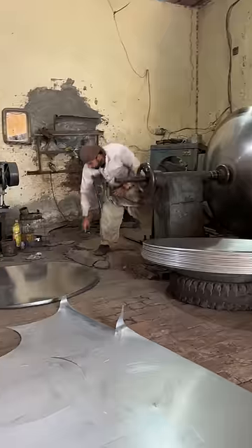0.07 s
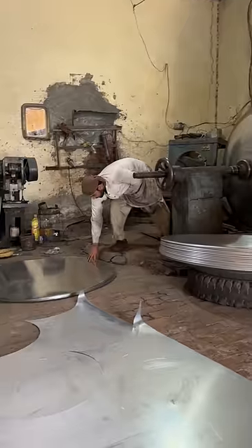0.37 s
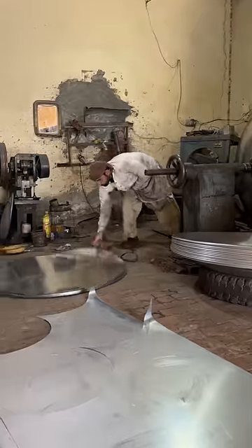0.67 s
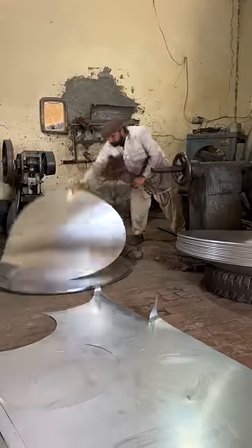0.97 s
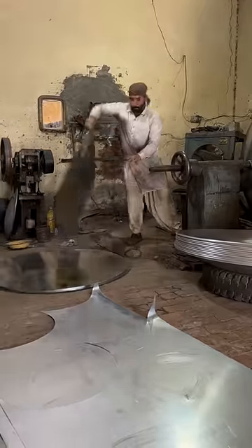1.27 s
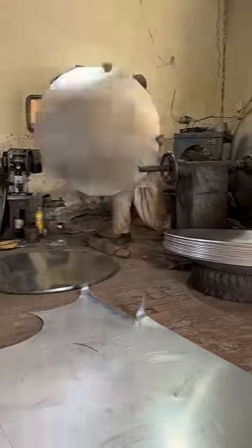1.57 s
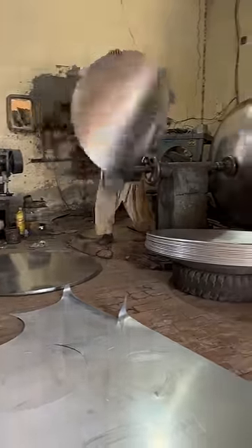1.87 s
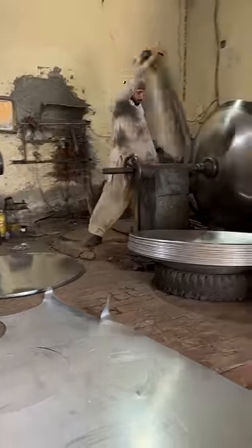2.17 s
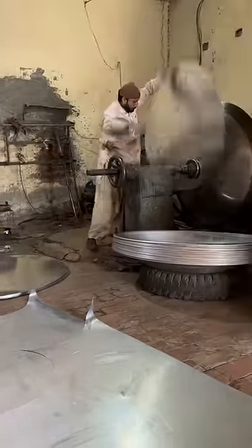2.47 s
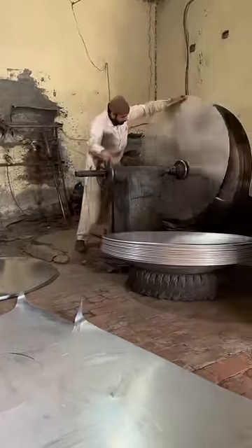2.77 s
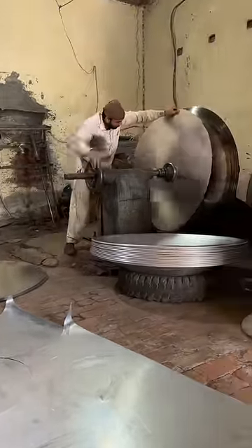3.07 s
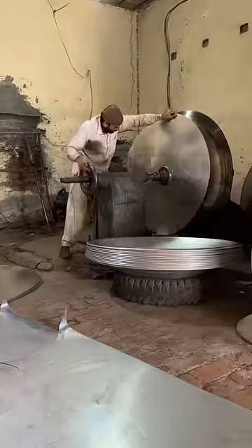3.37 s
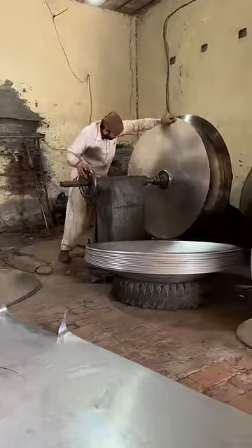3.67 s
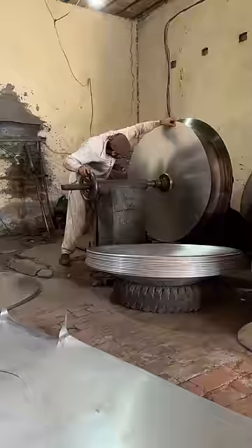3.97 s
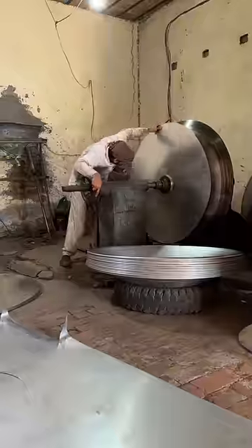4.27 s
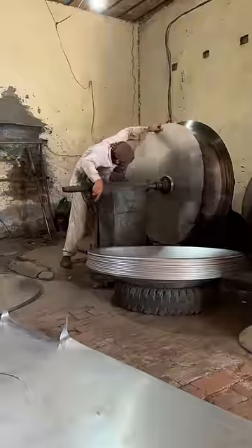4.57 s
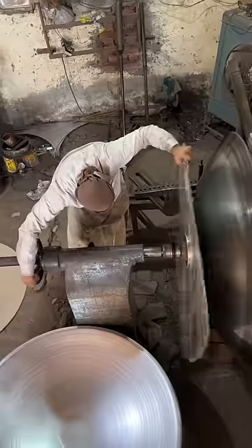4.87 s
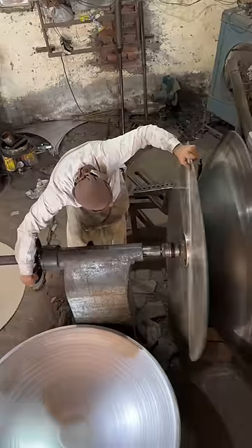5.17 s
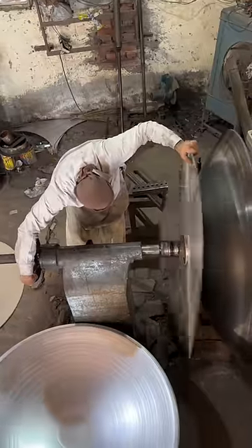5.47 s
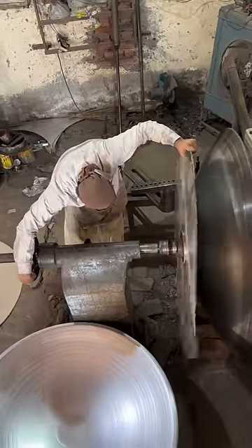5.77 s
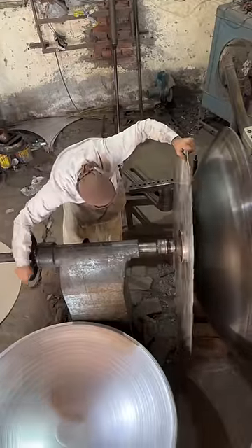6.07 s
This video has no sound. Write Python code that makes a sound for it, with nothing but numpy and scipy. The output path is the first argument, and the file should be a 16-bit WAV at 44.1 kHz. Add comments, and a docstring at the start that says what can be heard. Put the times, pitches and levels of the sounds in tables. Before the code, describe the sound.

After a few foot scuffs, a big metal sheet scrapes and squeals off a pile, then clangs and booms with a wavering pitch. Softer flexing and shuffling lead to a second loud burst as it meets a lathe chuck and starts spinning, clattering quickly and dying away. A motor hums faintly underneath, and the microphone picks up a short echo from the workshop's hard walls.

```python
"""A big thin metal disc is dragged off a stack in a workshop, carried, and pushed against a lathe chuck.
Each buckle excites its bending modes: it booms, and changing curvature makes the pitch wobble.
Sliding friction makes its edge hiss, grind and squeal. Then it spins up and its rim strikes the chuck
about ten times a second, dying away as the clamp tightens. Feet scuff, a motor hums, and
reflections from the bare walls add a short reverberation."""
import sys
import numpy as np
from scipy import signal
from scipy.fft import rfft, irfft, next_fast_len
from scipy.io import wavfile
from scipy.ndimage import uniform_filter1d, map_coordinates

SR = 44100
rng = np.random.default_rng(int(sys.argv[2]) if len(sys.argv) > 2 else 0)


def materialize(psi):
    """Save the field psi as 16-bit PCM at rate SR to the path in sys.argv[1].

    A 1-D psi becomes a single channel; in a 2-D psi each row is a channel.
    """
    bounded = np.clip(np.atleast_2d(psi).T, -1, 1)
    quanta = np.round(bounded * 32767).astype(np.int16)
    wavfile.write(sys.argv[1], SR, quanta)


N = 274302
T = np.arange(N) / SR
TICKS = T[::40]  # coarse time grid for envelopes
BANDS_HZ = 31.25 * 2 ** np.arange(0, 9.5, .5)
TOP_HZ = 15850
LEAN_S, CLAMP_S, SPIN_S = 2.55, 4.6, 4.94  # the disc meets the chuck, is clamped, starts to turn

# Levels in the tables are relative; each source applies its own gain.
# the disc's fixed ringing pitches: pitch_hz, level_db
DISC_MODES = [(114, -3.5), (288, -3), (428, -4), (463, -2.5), (544, -8.5), (673, -3.5), (1266, -6.5),
              (1420, -4), (1611, -12)]
# low modes that drone as it spins: pitch_hz, level_db
LOW_MODES = [(179, -2.5), (290, -4.5), (441, -0.5), (673, 1)]
# high modes of the rim: pitch_hz, level_db
HIGH_MODES = [(2035, -0.5), (2375, 1), (2982, -4), (3680, -17), (4380, -18.5), (5080, -20.5), (5840, -21.5)]
# the disc buckles: start_s, level_db, t60_s, lowest_strong_mode_hz
DISC_BUCKLES = [(0.664, -40.5, 1.27, 466), (.772, -31.5, 1.7, 308), (.88, -31.5, 0.26, 230),
                (1.013, -27, 0.2, 303), (1.327, -16.5, 1.65, 357), (1.373, -14.5, 1.4, 350),
                (1.592, -10.5, 0.44, 256), (1.661, -18, 1.2, 500), (1.93, -27, 0.29, 478),
                (2.256, -22.5, 0.45, 444), (2.282, -18.5, 0.3, 454), (2.361, -23.5, 1.4, 130),
                (2.383, -17, 1.3, 296), (2.659, -22, 0.51, 250), (2.801, -29.5, 1.6, 208),
                (3.026, -28, 0.12, 215.4), (3.109, -38, 1.07, 188), (3.265, -37, 0.67, 220),
                (3.404, -36.5, 0.39, 190), (3.63, -43.5, 2.6, 135), (4.026, -38, 1.15, 227),
                (4.268, -29.5, 1.6, 180), (4.355, -29, 2.4, 190), (4.543, -25, 1, 211),
                (4.647, -14, 0.13, 260), (4.68, -14.5, 1, 346), (4.734, -15, 0.6, 610),
                (4.794, -16, 0.3, 292), (4.886, -9, 0.21, 264)]
# one mode dominates a hard buckle: start_s, pitch_hz, level_db, t60_s, glide_octaves_per_s
MODE_GLIDES = [(.79, 592, -37, 0.12, 0), (.89, 451, -37, .22, -2.5), (1.33, 465, -19.5, 0.14, -0.7),
               (1.34, 1271, -26, 0.48, 0.5), (1.602, 345, -14, .13, 0.6), (1.604, 500, -19, 0.13, 0),
               (1.63, 548, -13.5, 0.08, 1), (1.65, 446, -17.5, 0.18, -1.7), (1.66, 666, -21.5, 0.22, 2.2),
               (2.262, 329.7, -25.5, 0.21, -0.8), (2.28, 690, -25, 0.4, 0.9), (2.28, 1105, -26.5, 0.18, 0),
               (2.29, 828, -24.5, .13, 0), (2.67, 468, -23, 0.2, -1), (3.028, 343, -42, 0.21, 0),
               (4.646, 347, -19, 0.17, 2), (4.738, 730, -18.5, 0.17, 1), (4.799, 268.6, -18.5, 0.11, 2),
               (4.885, 319.8, -18.5, .16, 1.5)]
# the rim knocks against metal: start_s, level_db, t60_s
RIM_KNOCKS = [(.775, -40.5, .16), (2.103, -41, .1), (3.03, -48, 0.083), (3.271, -63, 0.05),
              (4.032, -46, 0.075), (4.29, -49.5, .06), (4.738, -26.5, 0.51), (4.816, -15.5, 0.091),
              (4.913, -14.5, 0.041), (5.031, -19, 0.19), (5.168, -26, 0.16), (5.371, -16, 0.088)]
# the spinning rim slaps the chuck: start_s, level_db, zone_centre_hz
RIM_SLAPS = [(4.922, -17.5, 1440), (5.051, -19, 1500), (5.14, -18.5, 1700), (5.256, -19.5, 1150),
             (5.385, -21.5, 1980), (5.468, -20.5, 1080), (5.565, -23, 860), (5.668, -26, 890),
             (5.766, -26.5, 1200), (5.873, -28.5, 1300), (5.97, -36.5, 900), (6.05, -39, 1090)]
# the sliding edge squeals: start_s, pitch_hz, level_db, rise_s, t60_s
EDGE_SQUEALS = [(1.064, 3396, -34, 0.048, 0.38), (.775, 2470, -42, 0.011, 0.091)]
# the rim catches and clangs: start_s, level_db, rise_s, t60_s, tilt_db_per_octave
RIM_CLANGS = [(1.385, -42, 0.023, 0.54, -18), (1.599, -24, 0.023, .25, -4.5),
              (1.642, -23.5, .028, 0.2, 2.5), (2.39, -44, 0.071, 1.0, 0)]
# the disc slides over the stack: time_s, hiss_db, grind_db
DRAG_LEVELS = [(0.64, -60.5, -59), (0.692, -58, -46.5), (0.908, -40.5, -38), (0.994, -43, -32),
               (1.076, -24.5, -32), (1.154, -32, -25.5), (1.313, -54.5, -46.5), (1.361, -57.5, -44.5)]
# shoes and cloth brush past: start_s, level_db, rise_s, t60_s
FOOT_SCUFFS = [(.044, -46, 0.0086, 0.43), (.24, -52.5, 0.052, 2.4), (.34, -42.5, 0.068, 0.86),
               (2.142, -47.5, 0.022, 1.2), (2.249, -46, 0.0057, 2.4), (2.665, -42.5, 0.032, 0.45),
               (2.832, -49, 0.03, 0.39), (3.03, -54, .007, 0.35), (3.272, -60.5, .006, 3.8),
               (3.38, -51.5, 0.031, 0.22), (4.06, -67.5, 0.034, 1.6), (3.684, -40, 0.002, 0.51),
               (4.197, -59.5, .006, 0.79), (4.291, -51.5, 0.026, 2.4), (4.658, -45.5, 0.044, 0.65)]
# the level dips briefly: centre_s, depth_db, half_width_s
LEVEL_DIPS = [(4.875, -6.5, 0.0093)]
# spectral envelopes of the sources: frequency_hz, density_db
BOOM_SPECTRUM = [(25, -6), (60, -7), (125, 3.5), (330, 1.5), (650, 0.5), (1200, 0), (2400, -4.5),
                 (5000, -8), (9000, -12.5)]
RATTLE_SPECTRUM = [(30, -32), (100, -18), (170, -10), (320, 2), (480, -0.5), (800, 3.5), (1500, 1),
                   (2300, -1), (3200, -11), (4800, -16.5), (16000, -27.5)]
HISS_SPECTRUM = [(1500, -7), (3300, 1), (5000, 0.5), (7500, 0.5), (10000, -3), (12000, -20), (16000, 0.5)]
GRIND_SPECTRUM = [(200, -38), (500, -7.5), (850, 0), (1400, -6), (2600, -4.5), (4000, -23), (8000, -36.5)]
SCUFF_SPECTRUM = [(100, -13), (600, -0.5), (1300, -3), (2600, 3), (4500, -1), (7500, -2.5), (10000, -8.5),
                  (16000, -14.5)]
RUMBLE_SPECTRUM = [(20, -11.5), (50, -0.5), (80, 0.5), (200, -4.5), (1500, -22.5), (6000, -37.5),
                   (16000, -57.5)]
# stereo width: frequency_hz, side_over_mid_db
STEREO_WIDTH = [(60, -32.5), (120, -17), (250, -10), (600, -2.5), (2400, -2.5), (5000, 0), (9800, -1),
                (12000, 22.5), (14500, -0.5)]


def buckling_disc():
    """Snap-through buckling releases elastic energy as a boom, a deep sway and a lingering shimmer."""
    start, db, t60, low_hz = np.transpose(DISC_BUCKLES)[:, :, None]
    force_db = db + 13.5  # relative to a full-strength buckle
    hangs_free = start < LEAN_S
    # a small, tight buckle is higher throughout; leaning on the chuck dulls it
    bright_hz = np.where(hangs_free, 835, 550) * (low_hz / 300) ** 0.44
    rise_s = 0.0083 + 0.013 * t60  # broad, long-ringing bends build up more slowly than snaps
    vibration = flexing_plate() + amp(-9) * clicks(per_s=900, spread_db=3.5)
    booms = ring(vibration, start, db, boom_share(low_hz, bright_hz), rise_s, t60, cascade=0.43)
    sway_db = -43.5 + 0.74 * force_db
    sway_t60 = np.where(start < CLAMP_S, 0.99, 0.24)
    sway = ring(vibration, start, sway_db, boom_share(113, 304), rise_s=0.027, t60=sway_t60)
    # hard buckles spill far more energy into the high modes
    shimmer_db = -37.5 + 2.36 * force_db + np.where(hangs_free, 0, -11)
    shimmer = ring(vibration, start, shimmer_db, boom_share(1880, 2570), rise_s=0.11, t60=1.53 * t60)
    flapping = amp(-3 + 1.5 * walk(24.05))
    return flapping * (booms + sway + shimmer)


def boom_share(low_hz, bright_hz):
    """Band-limited excitation: a buckle hardly moves the modes under low_hz or over bright_hz."""
    low_cut = amp(-19) + 1 / np.sqrt(1 + (low_hz / BANDS_HZ) ** 6)
    return band_share(BOOM_SPECTRUM, bright_hz, steep=6.04) * low_cut


def flexing_plate(crossover_hz=480):
    """Curvature detunes the floppy low modes much further than the stiff high ones."""
    floppy = bending_plate(spacing_hz=27, detune=.075, bends_per_s=13, swap_hz=3.1)
    stiff = bending_plate(spacing_hz=43, detune=.025, bends_per_s=12, swap_hz=1.8)
    lows = filtered(floppy, lambda hz: 1 / np.hypot(1, (hz / crossover_hz) ** 2))
    highs = filtered(stiff, lambda hz: 1 / np.hypot(1, (crossover_hz / (hz + 1)) ** 2))
    return lows + highs


def bending_plate(spacing_hz, detune, bends_per_s, swap_hz):
    """Mode coupling: bending passes energy between two sets of modes and pulls their pitch about."""
    angle = 2 * np.pi * swap_hz * T
    modes = np.cos(angle) * plate(spacing_hz) + np.sin(angle) * plate(spacing_hz)
    return delayed(modes, detune * np.cumsum(walk(bends_per_s)) / SR)


def plate(spacing_hz, count=900):
    """Constant modal density: randomly placed modes, one per spacing_hz, join the fixed ones."""
    size = next_fast_len(N)
    offset, weakness, phase_turns = rng.random((count, 3)).T
    scattered = np.column_stack([(np.arange(count) + 1 + offset) * spacing_hz, -11 * weakness])
    hz, db = np.vstack([DISC_MODES, scattered])[:count].T
    phasors = amp(db) * np.exp(2j * np.pi * phase_turns)
    lines = np.zeros(size // 2 + 1, complex)
    lines[(hz[hz < TOP_HZ] * size / SR).astype(int)] = phasors[hz < TOP_HZ]
    return unit(irfft(lines, size)[:N])


def ring(vibration, start, db, share, rise_s, t60, cascade=0, hold=1):
    """Energy cascade: blows feed low modes first; the rise is rise_s at 600 Hz and goes as hz**cascade."""
    share = np.atleast_2d(share)
    share = share / np.linalg.norm(share, axis=1, keepdims=True)
    size = next_fast_len(N)
    spectrum = rfft(vibration, size)
    octave = np.log2(np.fft.rfftfreq(size, 1 / SR) + 1)
    out = 0
    for k, hz in enumerate(BANDS_HZ):
        window = np.maximum(1 - 2 * abs(octave - np.log2(hz)), 0)
        band = irfft(spectrum * window, size)[:N]
        blows = amp(db) * share[:, [k]] * swell(TICKS, start, rise_s * (hz / 600) ** cascade, t60, hold)
        out = out + steadied(band, seconds=0.061) * power_sum(blows)
    return out


def gliding_modes():
    """Stiffness follows curvature: the dominant mode of a hard buckle glides as the bend changes."""
    out, age = np.zeros(N + SR), T[:SR // 2]
    warble = 0.011 * walk(60)
    for (start, hz, db, t60, glide), phase_turns in zip(MODE_GLIDES, rng.random(len(MODE_GLIDES))):
        at = int(start * SR)
        span = slice(at, at + len(age))
        pitch_hz = hz * 2 ** (glide * age) * (1 + warble[span])
        tone = np.sqrt(2) * np.sin(2 * np.pi * (phase_turns + np.cumsum(pitch_hz) / SR))
        out[span] += amp(db) * swell(age, 0, rise_s=0.017, t60=t60, hold=1.59) * tone
    return out[:N]


def rattling_rim():
    """Impact excitation: contacts at the rim shake modes that slide in pitch as the disc flexes."""
    modes = bending_plate(spacing_hz=52, detune=.032, bends_per_s=11, swap_hz=3.7)
    vibration = modes + amp(-3) * clicks(per_s=500, spread_db=2)
    roughness = amp(-1 + 0.5 * walk(120))
    return roughness * (rim_knocks(vibration) + rim_slaps(vibration))


def rim_knocks(vibration):
    """A brief, hard contact with the stack or the lathe excites a broad band of modes."""
    start, db, t60 = np.transpose(RIM_KNOCKS)[:, :, None]
    share = band_share(RATTLE_SPECTRUM, bright_hz=4760, steep=1.4)
    return ring(vibration, start, db, share, rise_s=0.0066, t60=t60, cascade=0.088, hold=1.79)


def rim_slaps(vibration):
    """Repeated impacts, each favouring its own zone of modes, weaken as the clamp flattens the wobble."""
    start, db, zone_hz = np.transpose(RIM_SLAPS)[:, :, None]
    zone_db = 5.5 * np.exp(-(np.log2(BANDS_HZ / zone_hz) / 0.35) ** 2)
    bright_hz = 5900 * 2 ** (0.6 * (-16.5 - db))  # weaker slaps sound brighter
    share = amp(zone_db) * band_share(RATTLE_SPECTRUM, bright_hz, steep=1.1)
    return ring(vibration, start, db, share, rise_s=0.012, t60=0.18, cascade=0.052, hold=2.23)


def spinning_disc():
    """Forced vibration: the turning disc whirs in many modes and drones in a few low ones, then fades."""
    age = np.maximum(T - SPIN_S, 0)
    modes = bending_plate(spacing_hz=39.98, detune=.03, bends_per_s=8, swap_hz=2.3)
    midrange = filtered(modes, lambda hz: hz / np.hypot(hz, 282) / np.sqrt(1 + (hz / 2600) ** 5))
    whir = colour(midrange, RATTLE_SPECTRUM) * amp(-25 - 10 * age)
    drone = sum(amp(db) * rubbed_mode(hz, jitter=.06, per_s=30) for hz, db in LOW_MODES)
    spin_up = np.minimum(age / 0.17, 1)
    return spin_up * (whir + drone * amp(-37.5 - 12.5 * age))


def edge_squeals():
    """Self-excited vibration: friction makes single modes sing as the edge leaves the stack."""
    return sum(amp(db) * swell(T, start, rise_s, t60) * rubbed_mode(hz, jitter=.014 * hz / 2000, per_s=400)
               for start, hz, db, rise_s, t60 in EDGE_SQUEALS)


def rim_clangs():
    """Modal superposition: when the rim catches, its high modes sound together as a chord."""
    start, db, rise_s, t60, tilt_db = np.transpose(RIM_CLANGS)[:, :, None]
    strokes = amp(db) * swell(TICKS, start, rise_s, t60)
    chord = 0
    for hz, mode_db in HIGH_MODES:
        envelope = power_sum(strokes * amp(mode_db + tilt_db * np.log2(hz / 2375)))
        chord = chord + envelope * unit(rubbed_mode(hz, jitter=.008, per_s=280))
    return chord


def rubbed_mode(hz, jitter, per_s):
    """Uneven friction modulates one mode in frequency and amplitude."""
    phase = 2 * np.pi * np.cumsum(hz * (1 + jitter * walk(per_s))) / SR
    return 1.63 * amp(5.1 * walk(per_s / 2)) * np.sin(phase)


def stack_drag():
    """Sliding friction rings the disc; echoes in the widening gap below form a falling comb filter."""
    time_s, hiss_db, grind_db = np.transpose(DRAG_LEVELS)
    hiss = colour(clicks(per_s=9000, spread_db=3), HISS_SPECTRUM)
    hiss *= amp(np.interp(T, time_s, hiss_db, left=-120) + 5.5)
    hiss *= np.interp(T, [1.33, 1.5], [1, 0])  # the last of the edge leaves the stack
    grind = colour(clicks(per_s=1500, spread_db=4.5) + .4 * plate(spacing_hz=45), GRIND_SPECTRUM)
    lag_s = np.interp(T, [1.0, 1.3], [.0016, .0029])
    grind = unit(grind + .8 * delayed(grind, lag_s) + .5 * delayed(grind, 2 * lag_s))
    bite_db = np.interp(T, [.98, 1.06], [-7, 1])  # the edge bites only once the disc is tilted up
    return hiss + grind * amp(np.interp(T, time_s, grind_db, left=-120, right=-120) + bite_db)


def foot_scuffs():
    """Friction noise: the many tiny contacts of shoes and cloth merge into gritty brushes."""
    brushes = [amp(db) * swell(TICKS, start, rise_s, t60) for start, db, rise_s, t60 in FOOT_SCUFFS]
    return colour(clicks(per_s=7000, spread_db=2.5), SCUFF_SPECTRUM) * power_sum(brushes)


def motor_and_rumble():
    """A frequency-modulated motor hum and low workshop noise, both loudest near the stack."""
    hum = np.sin(2 * np.pi * np.cumsum(80 + 4 * walk(31)) / SR)
    hum_db = np.interp(T, [1, 4], [-55, -82])
    rumble_db = np.interp(T, [.5, 1.1, 2.95, 3.1], [-58, -48, -54, -63.5]) + 0.97 * walk(1.8)
    return amp(hum_db) * hum + amp(rumble_db) * colour(rng.standard_normal(N), RUMBLE_SPECTRUM)


def wall_echoes(x, t60, gap_s):
    """Diffuse reverberation: convolution with a decaying noise tail of unit energy."""
    tail = rng.standard_normal(SR) * swell(T[:SR], gap_s, 0.00085, t60)
    return signal.fftconvolve(x, tail / np.linalg.norm(tail))[:N]


def amp(db):
    """Decibels to amplitude ratio."""
    return 10 ** (np.asarray(db) / 20)


def unit(x):
    """Normalisation to rms 1."""
    return x / np.sqrt(np.mean(x ** 2))


def gain_at(hz, spectrum):
    """Interpolation of a spectrum on a log-frequency axis."""
    points_hz, db = np.transpose(spectrum)
    return amp(np.interp(np.log(hz + 1), np.log(points_hz), db))


def band_share(spectrum, bright_hz, steep):
    """Band amplitude grows as the root of bandwidth and rolls off above bright_hz."""
    return gain_at(BANDS_HZ, spectrum) * np.sqrt(BANDS_HZ) / np.sqrt(1 + (BANDS_HZ / bright_hz) ** steep)


def filtered(x, response):
    """Zero-phase filtering by a gain that is a function of frequency."""
    size = next_fast_len(N + SR // 10)
    return irfft(rfft(x, size) * response(np.fft.rfftfreq(size, 1 / SR)), size)[:N]


def colour(x, spectrum):
    """Spectral shaping, at rms 1."""
    return unit(filtered(x, lambda hz: gain_at(hz, spectrum)))


def walk(per_s):
    """Smooth random modulation that changes about per_s times a second."""
    hold = int(SR / per_s)
    steps = np.repeat(rng.standard_normal(N // hold + 1), hold)
    return unit(uniform_filter1d(steps, hold)[:N])


def clicks(per_s, spread_db):
    """Shot noise: tiny independent contacts of uneven size."""
    impulses = (rng.random(N) < per_s / SR) * rng.choice([-1, 1], N)
    return unit(impulses * amp(spread_db * np.clip(rng.standard_normal(N), -2, 2)))


def swell(t, start, rise_s, t60, hold=1):
    """Linear rise, then damping by 60 dB in t60 seconds; hold over 1 lingers before letting go."""
    age = t - start
    decay = np.exp(-np.log(1000) * (np.maximum(age - rise_s, 0) / t60) ** hold)
    return np.clip(age / rise_s, 0, 1) * decay


def power_sum(envelopes):
    """Incoherent addition: envelopes on TICKS add in power, giving one envelope on T."""
    return np.interp(T, TICKS, np.linalg.norm(envelopes, axis=0))


def delayed(x, seconds):
    """A variable delay, whose rate of change shifts the pitch."""
    return map_coordinates(x, [(T - seconds) * SR], order=3, mode="reflect")


def steadied(x, seconds):
    """Division by the running rms evens out swells slower than seconds."""
    power = uniform_filter1d(x ** 2, int(seconds * SR))
    return x / np.sqrt(power + .05 * np.mean(power))


def workshop():
    """Superposition of the direct sound and the reverberation of the bare room."""
    disc = buckling_disc() + gliding_modes() + rattling_rim() + spinning_disc()
    friction = edge_squeals() + rim_clangs() + stack_drag() + foot_scuffs()
    direct = disc + friction + motor_and_rumble()
    return direct + amp(-9) * wall_echoes(direct, t60=0.59, gap_s=0.0064)


def scene():
    """Decorrelation gives width: side walls return an unrelated mix of the modes; bass stays central."""
    mid = filtered(workshop(), lambda hz: 1 / np.hypot(1, gain_at(hz, STEREO_WIDTH)))
    side = filtered(workshop(), lambda hz: 1 / np.hypot(1, 1 / gain_at(hz, STEREO_WIDTH)))
    dips = amp(sum(db * np.exp(-((T - at) / width) ** 2) for at, db, width in LEVEL_DIPS))
    return dips * np.array([mid + side, amp(0.6) * (mid - side)])


def record(dry):
    """Soft saturation rounds the loudest peaks, and a steep low-pass cuts the top."""
    low_pass = signal.ellip(10, .2, 80, TOP_HZ, fs=SR, output="sos")
    return signal.sosfilt(low_pass, np.tanh(0.8 * dry) / 0.8)


dry = scene()
out = record(dry)
materialize(out)
```